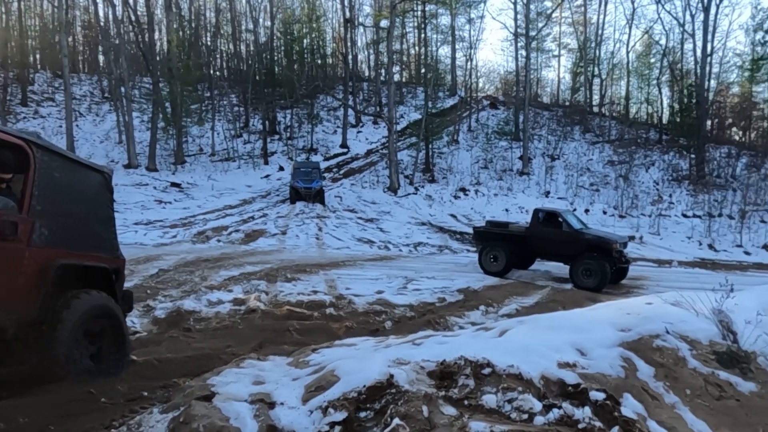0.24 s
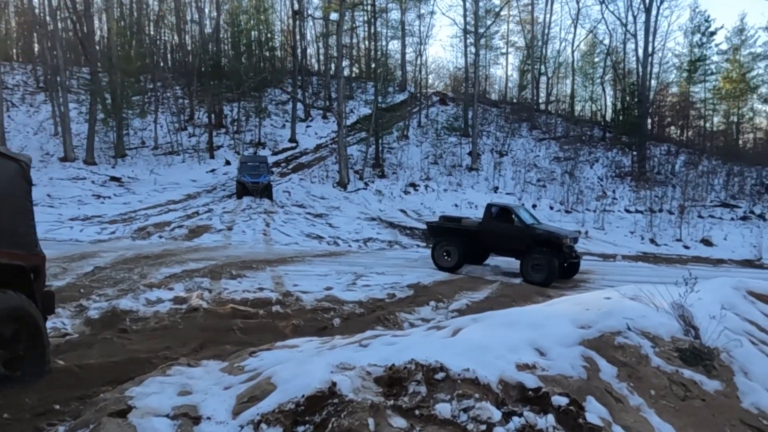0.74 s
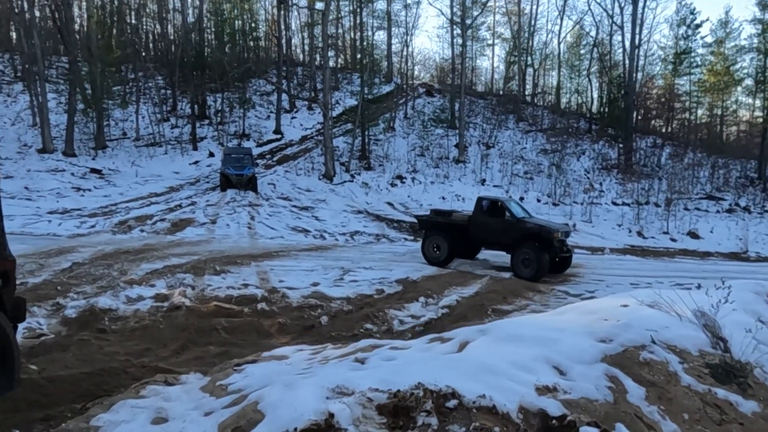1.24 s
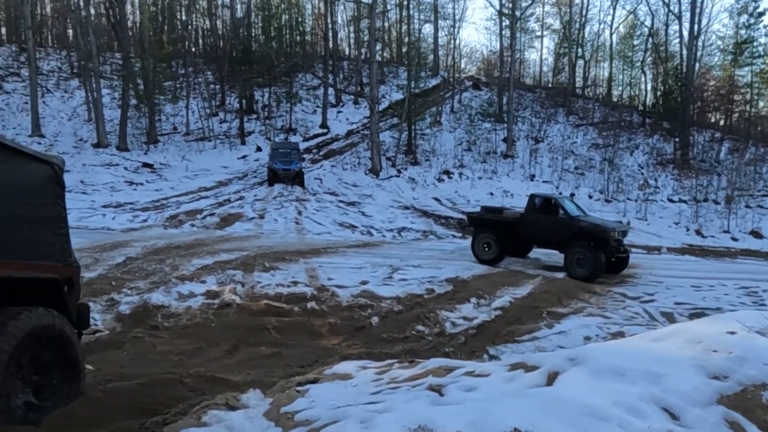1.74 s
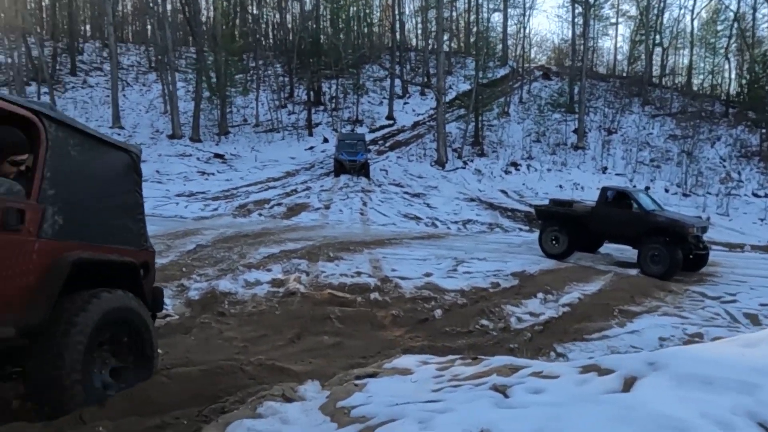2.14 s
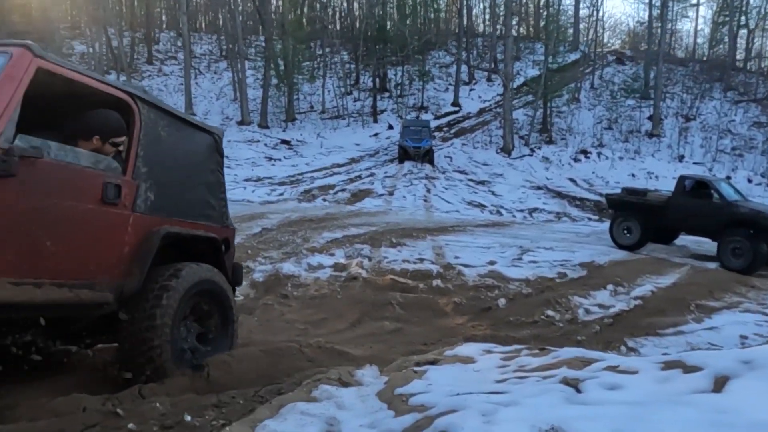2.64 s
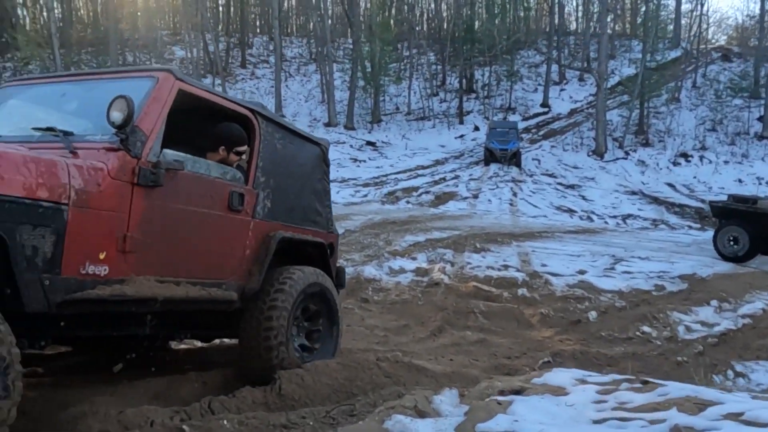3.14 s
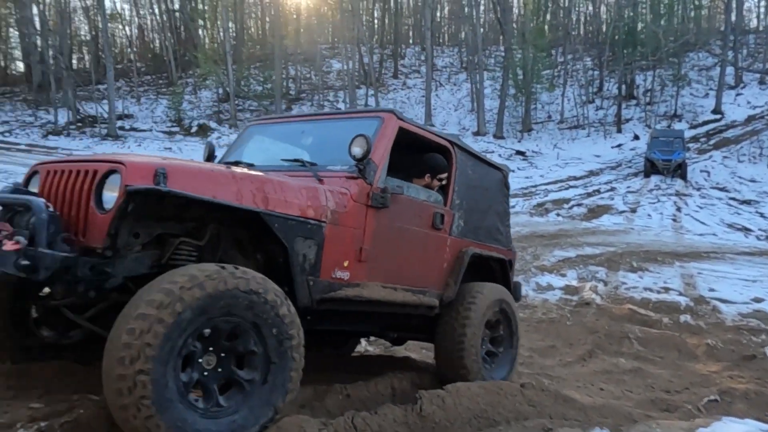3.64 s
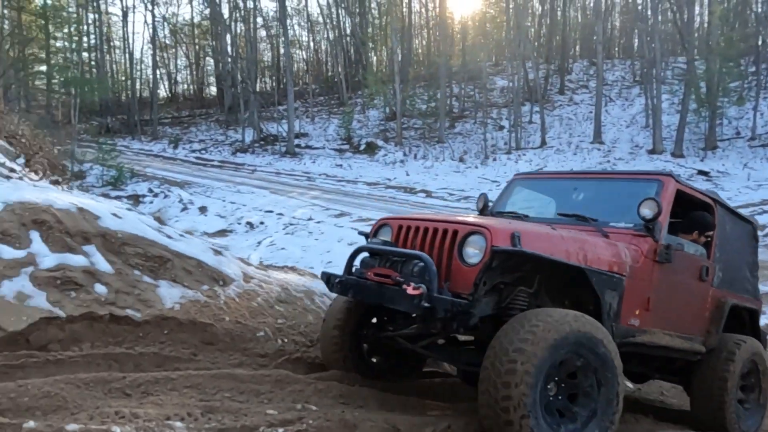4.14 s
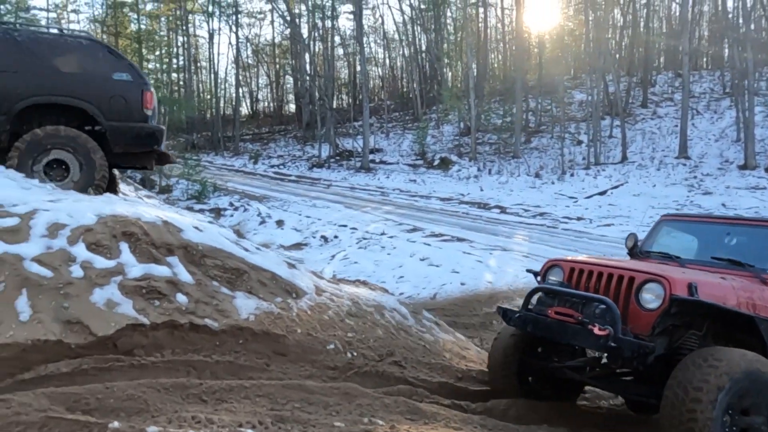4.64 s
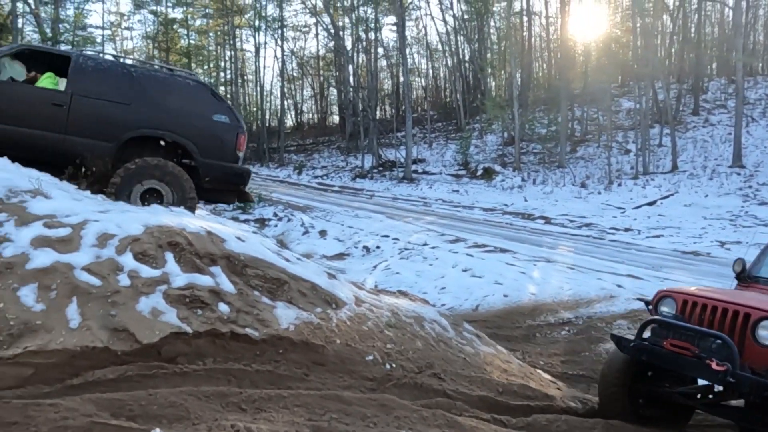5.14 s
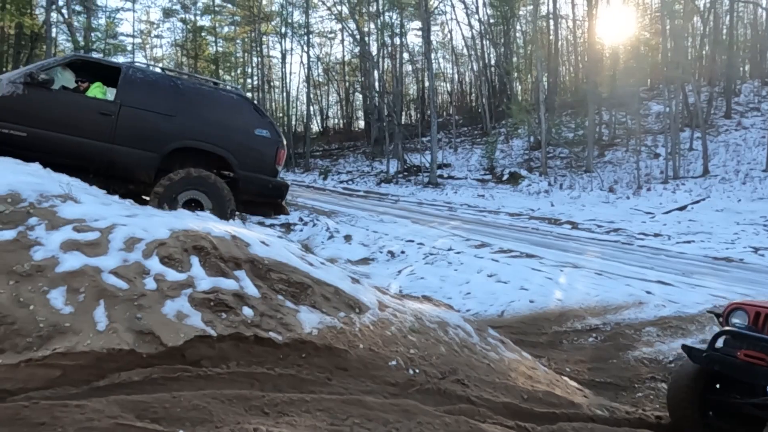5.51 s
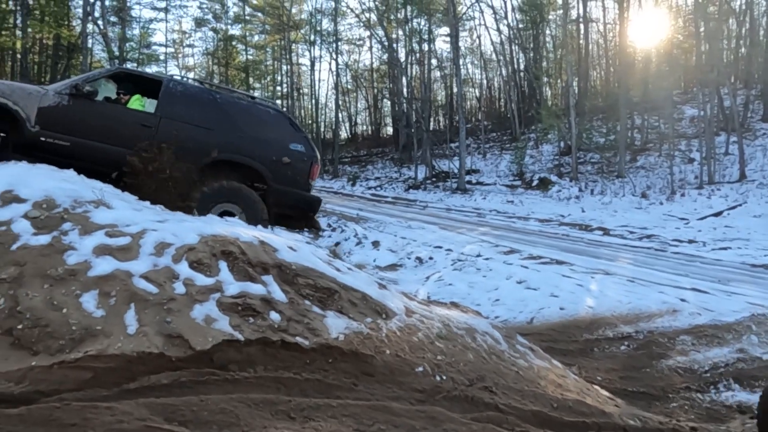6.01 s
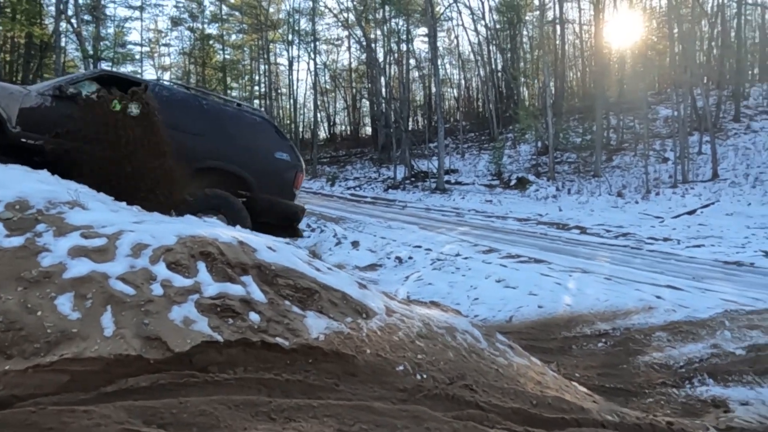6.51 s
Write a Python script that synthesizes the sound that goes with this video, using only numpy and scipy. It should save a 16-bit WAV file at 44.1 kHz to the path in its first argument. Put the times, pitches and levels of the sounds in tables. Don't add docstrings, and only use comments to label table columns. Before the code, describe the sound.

Steady V8 throb sinks to idle while another off-road engine blips far off, then roars repeatedly, crackles on overrun and climbs, flinging grit.

```python
import sys
import numpy as np
from scipy import signal
from scipy.fft import rfft, irfft, next_fast_len
from scipy.io import wavfile
from scipy.ndimage import uniform_filter1d

SR = 44100
rng = np.random.default_rng(int(sys.argv[2]) if len(sys.argv) > 2 else 0)


def log_audio(samples):
    frames = np.atleast_2d(samples).T
    limited = np.clip(frames, -1, 1)
    pcm = np.round(limited * 32767).astype(np.int16)
    wavfile.write(sys.argv[1], SR, pcm)


def volts_from_db(level):
    exponent = np.asarray(level, float) / 20
    return 10 ** exponent


N = 298557


def rms_one(x):
    return x / np.sqrt(np.mean(x ** 2) + 1e-20)


def in_time(rows):
    s, *columns = np.transpose(rows)
    return [np.interp(np.arange(N) / SR, s, c) for c in columns]


def on_log_axis(points, x):
    points = np.array(points)
    return np.interp(np.log(x), np.log(points[:, 0]), points[:, 1])


def drift(rate_hz):
    r = np.exp(-80 * np.pi * rate_hz / SR)
    white = rng.standard_normal(N // 40 + 2002)
    slow = signal.lfilter([1], [1, -2 * r, r * r], white)[2000:]
    return np.interp(np.arange(N) / 40, np.arange(len(slow)), rms_one(slow))


def cut(x, hz, kind, order=2):
    return signal.sosfilt(signal.butter(order, hz, kind, fs=SR, output="sos"), x)


def resonate(x, modes):
    out = 0
    for k, (hz, width_hz, db) in enumerate(modes):
        r = np.exp(-np.pi * width_hz / SR)
        b = (1 - r * r) / 2 * np.array([1, 0, -1])
        a = [1, -2 * r * np.cos(2 * np.pi * hz / SR), r * r]
        out = out + (-1) ** k * volts_from_db(db) * signal.lfilter(b, a, x)
    return out


def evened(x):
    power = uniform_filter1d(uniform_filter1d(x ** 2, size=6000), size=6000)
    return x / np.sqrt(power + 1e-12)


def gates(rows, open_db_per_s, shut_db_per_s):
    t = np.arange(0, N + 50, 50) / SR
    power = 0
    for s, end, db, end_db, *_ in rows:
        corners_s = [s - 60 / open_db_per_s, s, end, end + 60 / shut_db_per_s]
        power = power + volts_from_db(2 * np.interp(t, corners_s, [db - 60, db, end_db, end_db - 60]))
    return np.interp(np.arange(N) / SR, t, power)


def bursts(rows, decay_s, gain_db=0):
    s, db = np.transpose(rows)
    hits = np.zeros(N) + 1e-9
    hits[(s * SR).astype(int)] = volts_from_db(db + gain_db)
    return signal.lfilter([1], [1, -np.exp(-1 / (decay_s * SR))], hits) * rng.standard_normal(N)


# pitch_hz, share of the left-right dB
LEAN = [(60, .02), (250, 0.028), (500, 0.55), (1200, 1.54), (5000, 0.63), (12000, 2.3)]


def placed(x, hz, pan_db):
    left = np.exp(np.log(10) / 40 * on_log_axis(LEAN, hz) * pan_db)
    return x * np.reshape([left, 1 / left], (2, -1))


# firing_spread_db, out_of_step_turns, lag_per_order_turns
ROUGHNESS = dict(steady=(.6, 1, 0), blips=(1.2, .6, 0), revs=(.7, .14, 0), rasp=(.8, .35, 0),
             overrun=(1.4, 1, 0))
AGAINST = (4, 12, 13)


def firings(cycles, orders_db, voice, against):
    spread_db, out_of_step, lag = ROUGHNESS[voice]
    turns = np.cumsum(cycles / SR)
    phase_turns = out_of_step * rng.random(64) - lag / 2 * np.arange(1, 65) ** 2
    orders = np.zeros(1025, complex)
    orders[1:65] = np.resize(volts_from_db(np.array(orders_db)), 64) * np.exp(2j * np.pi * phase_turns)
    orders[list(against)] *= -1
    cycle = rms_one(irfft(orders))
    slowing = -uniform_filter1d(np.gradient(cycles) * SR, size=4000)
    overrun = 1 + np.clip(slowing / 30, 0, 1.2)
    chance = np.interp(8 * turns, np.arange(3000), rng.standard_normal(3000))
    pulses = np.interp(turns % 1, np.arange(2048) / 2048, cycle, period=1)
    return pulses * volts_from_db(spread_db * overrun * chance)


def engine(cycles, levels_db, orders_db, pipes, voice, in_step=False):
    size = next_fast_len(N + SR)
    pulses = rfft(firings(cycles, orders_db, voice, AGAINST if in_step else ()), size)
    click = signal.unit_impulse(SR // 2)
    out = []
    for db, (modes, band_hz) in zip(levels_db, pipes):
        colour = rfft(cut(resonate(click, modes), band_hz, "band"), size)
        if in_step:
            colour = np.abs(colour)
        out.append(-volts_from_db(db) * evened(irfft(pulses * colour, size)[:N]))
    return out


# start_s, cycles_per_s
STEADY_SPEED = [(0.0, 13.18), (0.5, 13.23), (1.0, 13.21), (1.5, 13.3), (2.0, 13.25), (2.3, 13.15),
                (2.5, 12.84), (2.7, 12.06), (3.0, 10.7), (3.4, 8.77), (3.7, 7.9)]
# start_s, cycles_per_s
IDLE_SPEED = [(4.2, 7.2), (4.6, 6.9), (6.8, 6.9)]


def near_speed():
    return in_time(list(STEADY_SPEED) + list(IDLE_SPEED))[0]


# start_s, boom_db
STEADY = [(0, -12), (2.3, -13), (2.7, -13), (3.2, -16), (3.36, -6), (3.45, -21), (3.56, -14), (3.7, -11),
          (4.1, -13.5), (4.3, -18), (4.5, -16), (4.75, -18.5), (4.9, -23.5), (5.3, -24), (5.6, -23),
          (6.8, -20)]
# cycles_per_s, db_re_boom
STEADY_BARK_SHARE = [(7, -13), (9, -32), (13, -29)]
# level_db; uneven banks feed 3, 5, 11, 13 beside firing order 8
STEADY_ORDERS = [-1.5, -31.5, -9, -13.5, -3, -54.5, -19.5, -4.5, -18, -16.5, -7, -18, -8.5, -24.5, -5, -5]
# pitch_hz, width_hz, level_db
STEADY_BOOM = [(74.9, 30.7, 4), (111.2, 35, 5.5), (176, 77, -6.5)]
# pitch_hz, width_hz, level_db
STEADY_BARK = [(253, 40, -10), (361, 40, -12.5), (562, 36, -5.5), (1240, 76, -17)]


def near_engine():
    cycles = near_speed()
    boom_db = in_time(STEADY)[0]
    bark_db = boom_db + on_log_axis(STEADY_BARK_SHARE, cycles)
    pipes = [(STEADY_BOOM, [40, 240]), (STEADY_BARK, [230, 1500])]
    return engine(cycles, (boom_db, bark_db), STEADY_ORDERS, pipes, "steady")


# start_s, cycles_per_s
REVS_SPEED = [(2.55, 22.27), (2.75, 31.7), (2.88, 35.87), (3.05, 33.53), (3.4, 38.9), (3.58, 35.31),
              (3.91, 43.4), (4.05, 39.57), (4.2, 34.12), (4.7, 14.04), (4.82, 12.34), (5.0, 18.22),
              (5.15, 21.27), (5.43, 13.16), (6.2, 33.0), (6.35, 36.0), (6.55, 38.67), (6.77, 40.49)]
# open_s, shut_s, open_roar_db, shut_roar_db, drone_db_re_boom
STABS = [
    (2.567, 2.802, -38, -34.5, -1.5),
    (3.086, 3.336, -35, -32, -3),
    (3.614, 3.854, -31, -30, -4.5),
    (4.025, 4.161, -30.5, -33, -34),
    (4.88, 5.044, -31.5, -34, -19.5),
    (5.509, 5.562, -32, -32, -23),
    (5.698, 6.108, -29, -32, -6),
    (6.163, 6.765, -30.5, -30.5, -6),
]
# start_s, shut_rush_db, left_right_db, distance_dulling_db
PASSAGE = [(0, -37, 2.5, -3.5), (.5, -40, 3.5, -2), (1.0, -41, 6, -0.5), (1.43, -41.5, 9, 1),
           (2.2, -39, 6, 3.5), (3.0, -40, 4, -3), (3.5, -40.5, 4.5, -3.5), (3.94, -39, 1.5, -6),
           (4.28, -38.5, -0.5, -1.5), (4.42, -39, 2, 5.5), (4.75, -46, 0, 5.5), (4.9, -42, 3, 12.5),
           (5.2, -43, 0, 10.5), (5.41, -50, -2, 5.5), (5.62, -41.5, 3.5, 14), (5.8, -34.5, -2.5, 8.5),
           (6.2, -46.5, 0, 4.5), (6.77, -34, -1.5, -1)]


def controls():
    shut_db, pan_db, dull_db = in_time(PASSAGE)
    stabs = gates(STABS, open_db_per_s=174, shut_db_per_s=120.5)
    power = stabs + volts_from_db(2 * shut_db)
    opened = stabs / power
    return in_time(REVS_SPEED)[0], 10 * np.log10(power), opened, pan_db * (1 + opened), dull_db


TURN_AWAY_S = 3.97
LOW_OPEN_DB = -14
# cycles_per_s, level_db
DRONE_SHARE = [(14, -9.5), (24, -10), (32, 4.5), (36, -2), (41, -14)]
# cycles_per_s, db_re_roar
BARK_SHARE = [(14, 5.5), (28, 12.5), (35, 15), (42, 16.5)]
# cycles_per_s, level_db
BOOM_SHARE = [(13, -7.5), (19, 1.5), (24, 2.1)]


def rev_levels(cycles, roar_db, opened):
    shut_db, lag_s, arrive_s = -19.5, 0.11, 2.5
    near_db = in_time([(arrive_s - .15, -45), (arrive_s, 0)])[0]
    low_db = shut_db + (LOW_OPEN_DB - shut_db) * uniform_filter1d(opened, int(lag_s * SR)) + near_db
    slowing = np.clip(-uniform_filter1d(np.gradient(cycles) * SR, size=4000) / 63, 0, 1)
    low_db = low_db + slowing * (1 - opened)
    lean_db = in_time([(s, row[4]) for row in STABS for s in row[:2]])[0]
    lean_db = lean_db + on_log_axis(DRONE_SHARE, cycles)
    boom_db = low_db - 10 * np.log10(1 + volts_from_db(2 * lean_db))
    away_db = in_time([(TURN_AWAY_S, 0), (TURN_AWAY_S + 0.012, -4.5)])[0]
    bark_db = roar_db + on_log_axis(BARK_SHARE, cycles) + near_db + away_db - 9 * (1 - opened)
    return boom_db + on_log_axis(BOOM_SHARE, cycles), boom_db + lean_db, bark_db


REVS_ORDERS = [-10, 5, 5, -3.5, 10, -30, -14, 2.5, 6, -5, 4, -5.5, 5.5, 6, -30, 8, 1, -10.5, 3, 6, -1, -10,
               1.5, 5.5]
# pitch_hz, width_hz, level_db
REVS_BOOM = [(66.7, 116, -8.5), (126.4, 21.7, 2)]
# pitch_hz, width_hz, level_db
REVS_DRONE = [(178, 54, 0.1)]
# pitch_hz, width_hz, level_db
REVS_BARK = [(268.3, 26, 9.5), (389.8, 44, 8), (525, 69, -1), (643, 100, -3.5)]
# pitch_hz, width_hz, level_db
SHUT_PIPE = [(74, 30, -4)]
LOW_BAND_HZ, DRONE_BAND_HZ, MIDDLE_BAND_HZ = [40, 144], [145, 192.7], [230, 615]


def revving_engine(cycles, roar_db, opened):
    levels_db = rev_levels(cycles, roar_db, opened)
    pipes = [(REVS_BOOM, LOW_BAND_HZ), (REVS_DRONE, DRONE_BAND_HZ), (REVS_BARK, MIDDLE_BAND_HZ)]
    boom, drone, bark = engine(cycles, levels_db, REVS_ORDERS, pipes, "revs", in_step=True)
    boom = boom - (1 - opened) * resonate(boom, SHUT_PIPE)
    return boom + drone, growled(bark, levels_db[2], cycles, opened)


# cycles_per_s, power_0_1
CLEAN_SHARE = [(16, .4), (24, .85), (31, .97), (38, .99)]
# cycles_per_s, share
LOW_PIPE_LOSS = [(30, .05), (36, 0.045), (39, 0.78), (42, 0.37)]
# pitch_hz, width_hz, level_db
LOW_PIPE = [(280, 87, 0)]
# pitch_hz, width_hz, level_db
SIDE_PIPE = [(625, 90, 2.5), (505, 90, -4), (330, 60, -3)]
# pitch_hz, width_hz, level_db
AWAY_PIPE = [(508, 99, 1.5), (419, 80, -9.5)]


def growled(bark, bark_db, cycles, opened):
    behind_s = 5.2
    clean = on_log_axis(CLEAN_SHARE, cycles) * (.55 + .45 * opened)
    gas = rms_one(cut(resonate(rng.standard_normal(N), REVS_BARK), [230, 726], "band"))
    bark = np.sqrt(clean) * bark + np.sqrt(1 - clean) * volts_from_db(bark_db) * gas
    bark = bark - np.clip(on_log_axis(LOW_PIPE_LOSS, cycles), 0, 1) * resonate(bark, LOW_PIPE)
    side, behind = in_time([(TURN_AWAY_S, 0, 0), (TURN_AWAY_S + 0.03, 1, 0),
                            (behind_s, 1, 0), (behind_s + .1, 0, 1)])
    return bark + side * resonate(bark, SIDE_PIPE) + behind * resonate(bark, AWAY_PIPE)


# cycles_per_s, db_re_low_power
LUG_SHARE = [(12, -0.5), (17, -7.5), (20, -29.5), (24, -55)]


def lug(cycles, opened):
    pull = uniform_filter1d(opened * (np.gradient(cycles) > 0), size=1000, origin=-400)
    level = volts_from_db(LOW_OPEN_DB + 8.5 + on_log_axis(LUG_SHARE, cycles))
    return pull * level * np.sin(16 * np.pi * np.cumsum(cycles) / SR)


# pitch_hz, width_hz, level_db
REVS_RASP = [(800, 160, -3), (960, 120, 0), (1200, 200, -7), (1680, 260, -7), (2000, 500, -13)]
# cycles_per_s, db_re_roar
RASP_SHARE = [(15, -14), (32, -9), (37, -2.5), (41, 0)]


def rasp(cycles, roar_db):
    level_db = in_time([(2.4, -60), (2.55, 0)])
    orders = engine(cycles, level_db, REVS_ORDERS, [(REVS_RASP, [700, 2200])], "rasp", in_step=True)[0]
    return volts_from_db(roar_db + on_log_axis(RASP_SHARE, cycles)) * orders + honk(orders)


# start_s, length_s, pitch_hz, level_db, width_re_pitch
HONK = [(0.0, 1.3, 1110, -50, .14), (.9, 1.6, 1240, -53, .16), (2.555, .31, 1900, -41, .26),
        (2.57, .29, 1050, -43, .35), (3.06, .34, 1960, -36, .22), (3.08, .3, 1600, -41, .12),
        (3.6, .25, 1660, -36, .08), (3.7, .1, 2420, -42, .07), (3.995, .11, 965, -31, .06),
        (3.995, .08, 1075, -33, .06), (4.815, .17, 1300, -39, .3), (4.96, .13, 1850, -41, .2),
        (6.04, .5, 1760, -43, .16), (6.5, .4, 1170, -36, .08), (5.8, 2.1, 2600, -39.5, .6)]


def honk(orders):
    out = np.zeros(N)
    drive = cut(orders, 1400, "low", order=4) + .6 * rng.standard_normal(N)
    for s, length_s, hz, db, width in HONK:
        span = slice(int(s * SR), int((s + length_s) * SR))
        ring = [(hz, width * hz, 0)]
        tone = rms_one(resonate(resonate(drive[span], ring), ring))
        fade = np.hanning(int(length_s * SR) + 1)[:len(tone)] ** .16
        out[span] += volts_from_db(db + 6) * fade * tone
    return out


# start_s, level_db
BURBLE = [(3.9, -70), (4.15, -25), (4.35, -21.5), (4.6, -33), (4.9, -29.5), (5.2, -31), (5.4, -33.5),
          (5.6, -31.5), (5.9, -66)]
# pitch_hz, width_hz, level_db
BURBLE_PIPE = [(315.6, 24.6, 0.1)]


def burble(cycles):
    level_db = in_time([(0, -103.0)] + list(BURBLE))
    return engine(cycles, level_db, REVS_ORDERS, [(BURBLE_PIPE, MIDDLE_BAND_HZ)], "overrun")[0]


# start_s, peak_db
POPS = [
    (4.25, -29),
    (4.32, -29),
    (4.474, -23),
    (4.58, -31),
    (4.608, -25),
    (4.749, -20),
    (5.496, -19.5),
]


def pops():
    bangs = cut(bursts(POPS, decay_s=.016), 3000, "low")
    return volts_from_db(14.5) * resonate(bangs, REVS_BARK) + volts_from_db(6) * resonate(bangs, REVS_RASP[:2])


# start_s, cycles_per_s
BLIPS_SPEED = [(0.0, 21.5), (0.25, 21.4), (0.5, 16.41), (0.8, 13.09), (1.0, 12.87), (1.5, 26.0),
               (2.0, 34.39), (2.27, 42.43), (2.4, 40.35)]
# open_s, shut_s, open_db, shut_db
BLIPS = [
    (.25, .35, -22, -19),
    (.75, .85, -22, -30),
    (1.15, 1.18, -16.5, -18.5),
    (1.38, 1.88, -15, -23),
    (2.15, 2.3, -24, -23),
]
# cycles_per_s, db_re_boom
BLIP_BARK_SHARE = [(13, -18), (17, -19.5), (22, -20), (30, -15.5), (42, -10)]
BLIPS_ORDERS = [-15, 0.5, 5, -19, 8, -38.5, -13.5, 4, 5.5, -5, 4.5, -22, 6, 6, -45, 7.5]
# pitch_hz, width_hz, level_db
BLIPS_BOOM = [(69.5, 67, -12), (126, 17, 1), (152, 26, -3.5)]
# cycles_per_s, power_0_1
FAR_CLEAN_SHARE = [(30, .05), (37, .2), (41, .9)]


def far_engine():
    end_s, idle_db = 2.42, -23
    cycles = in_time(BLIPS_SPEED)[0]
    away_db = in_time([(end_s, 0), (end_s + 0.23, -35)])[0]
    power = gates(BLIPS, open_db_per_s=77, shut_db_per_s=82) + volts_from_db(2 * idle_db)
    boom_db = 10 * np.log10(power) + away_db
    bark_db = boom_db + on_log_axis(BLIP_BARK_SHARE, cycles)
    pipes = [(BLIPS_BOOM, LOW_BAND_HZ), (REVS_BARK, MIDDLE_BAND_HZ)]
    boom, bark = engine(cycles, (boom_db, bark_db), BLIPS_ORDERS, pipes, "blips")
    clean = on_log_axis(FAR_CLEAN_SHARE, cycles)
    return boom, bark * (np.sqrt(clean) + np.sqrt(1 - clean) * drift(40))


# pitch_hz, left_right_likeness_0_1
LIKENESS = [(25, .95), (100, .95), (500, .96), (1500, .92), (4500, .85), (9000, .65), (13000, .2)]


def banded_noise(spectrum, low_hz, high_hz, patchy_db, pan_db, count=2):
    out, together, white = 0, drift(12.7), rng.standard_normal((2, 2, N))
    edges_hz = np.geomspace(low_hz, high_hz, round(count * np.log2(high_hz / low_hz)) + 1)
    for k, (low, high) in enumerate(zip(edges_hz, edges_hz[1:])):
        mid, side = cut(white[k % 2], [low, high], "band")
        hz = np.sqrt(low * high)
        alike = np.clip(on_log_axis(LIKENESS, hz), 0, 1)
        gain = volts_from_db(on_log_axis(spectrum, hz) + patchy_db * (0.82 * together + drift(16.6)))
        band = np.sqrt(1 + alike) * mid + np.sqrt(1 - alike) * side * [[1], [-1]]
        out = out + placed(gain * band, hz, pan_db)
    return out / np.sqrt(np.mean(out.mean(axis=0) ** 2))


# pitch_hz, db_per_hz
ROAR = [(350, -29), (600, -1), (768, -2), (950, -3), (1270, -3), (1690, -7.5), (2610, -12), (5170, -18)]
# pitch_hz, db_per_hz
HISS = [(2610, -14), (5170, -16), (6470, -21), (7300, -24), (8280, -31.5), (9500, -34.5), (11000, -43.5)]
# pitch_hz, db_per_hz
TOP = [(9500, -14), (10300, -15), (11200, -10), (12200, 0), (13200, -4), (13800, -9), (14300, -20),
       (15600, -27)]
# cycles_per_s, level_db
NOISE_SHARE = [(30, 0.7), (37, 4), (41, 4.5)]
CLATTER = [(2, 0.082), (3, 0.11), (5, 0.09)]


def rush(cycles, roar_db, opened, pan_db, dull_db):
    hiss_db = -7.5 - 2 * opened - 0.57 * dull_db
    away_db = in_time([(TURN_AWAY_S, 0), (TURN_AWAY_S + .1, -2)])[0]
    top_db = -21.5 - 6 * opened - dull_db + away_db
    turns = np.cumsum(cycles / SR)
    throb = 0.059 * np.cos(2 * np.pi * turns) + 0.12 * np.cos(6 * np.pi * turns)
    load = np.clip((roar_db + 42.5) / 14, .2, 1)
    roar = banded_noise(ROAR, 650, 3300, 1.2, pan_db, count=3)
    roar = volts_from_db(roar_db - 1.5 + on_log_axis(NOISE_SHARE, cycles)) * roar
    hiss = volts_from_db(roar_db + hiss_db - 1.5) * banded_noise(HISS, 3260, 11230, 0.89, pan_db, count=4)
    top = volts_from_db(roar_db + top_db - 3.0) * banded_noise(TOP, 6900, 16000, 1.5, pan_db, count=9)
    near = np.cumsum(near_speed() / SR)
    clatter = (1 - opened) * sum(depth * np.cos(2 * np.pi * order * near) for order, depth in CLATTER)
    return (1 + load * throb) * roar + (1 + 2.0 * opened * throb + clatter) * (hiss + top)


FAN_BLADES = 24
# pitch_hz, width_hz, level_db
FAN_SHROUD = [(4850, 800, 0), (6050, 1050, 0)]
# start_s, lower_db, upper_db
FAN = [(3.7, -70, -70), (3.92, -50, -60), (3.97, -40, -44), (4.05, -45, -45), (4.12, -50, -56),
       (4.2, -46, -58), (4.3, -56, -62), (4.53, -56, -68), (4.6, -72, -75), (5.8, -75, -66),
       (6.05, -62, -54), (6.15, -64, -55), (6.25, -62, -48), (6.52, -60, -47), (6.77, -56, -53)]


def fan():
    turns = FAN_BLADES * np.cumsum(in_time(REVS_SPEED)[0] / SR)
    partials = sum(np.sin(2 * np.pi * k * turns) for k in range(5, 11))
    out = 0
    for db, shroud in zip(in_time(FAN), FAN_SHROUD):
        out = out + volts_from_db(db + 3 * drift(40)) * resonate(resonate(partials, [shroud]), [shroud])
    return out


def whistle(rows, waver, flutter_db, times=1):
    grip_s, slip_share, edge_db, fade_s = 0.015, 0.67, -6, .015
    catch_rise, catch_s, sag_per_s = 0.026, 0.023, 0.019
    out = np.zeros(N)
    wobble, flutter = 1 + waver * drift(60), volts_from_db(flutter_db * drift(49))
    for s, length_s, hz, db, *end_hz in rows:
        first, last = int((s - fade_s) * SR), int((s + length_s + fade_s) * SR)
        span = np.arange(max(first, 0), min(last, N))
        t = span / SR - s
        corners_s = [0, min(grip_s, length_s / 2), length_s * (1 - slip_share / 2), length_s]
        level_db = db + np.interp(t, corners_s, [edge_db, 0, 0, edge_db])
        fade = np.clip(np.minimum(t, length_s - t) / fade_s + 1, 0, 1)
        if end_hz:
            glide_hz = np.interp(t, [0, length_s], [hz, end_hz[0]])
        else:
            catch = catch_rise * np.exp(-np.maximum(t, 0) / catch_s)
            glide_hz = hz * (1 - sag_per_s * (t - length_s / 2) + catch)
        phase = 2 * np.pi * np.cumsum(times * glide_hz * wobble[span]) / SR
        out[span] += fade * volts_from_db(level_db + 10) * np.sin(phase)
    return out * flutter


# start_s, length_s, pitch_hz, level_db, end_hz
SQUEAL_1 = [(.298, .035, 3460, -47.5, 3330), (.33, .045, 3320, -54, 3270), (.38, 0.06, 3330, -51.5, 3260),
            (.485, 0.097, 3340, -50, 3290), (.62, 0.036, 3310, -59, 3320), (.76, .06, 3430, -45.5, 3350),
            (.815, .09, 3330, -51, 3240), (.91, 0.083, 3330, -49, 3270), (1.11, 0.16, 3330, -53.5, 3220),
            (1.275, 0.063, 3280, -53.5, 3250), (1.612, 0.058, 3385, -44, 3395),
            (1.655, .11, 3400, -45.5, 3425), (1.745, 0.097, 3430, -52, 3280),
            (1.86, 0.065, 3350, -57, 3250), (2.13, 0.09, 3440, -56.5, 3450), (2.72, 0.14, 3390, -58, 3360),
            (3.455, 0.048, 3390, -46, 3360), (3.515, 0.054, 3390, -46, 3310)]
# start_s, length_s, pitch_hz, level_db
SQUEAL_2 = [(1.4, 0.3, 7040, -71), (1.8, 0.46, 6970, -72), (2.2, 0.17, 6970, -68), (2.56, 0.39, 6920, -64),
            (3.38, 0.46, 7120, -65), (4.455, .025, 6900, -65), (4.57, 0.017, 6900, -65),
            (5.62, .45, 6800, -68)]
# start_s, length_s, pitch_hz, level_db, end_hz (some)
SQUEAL_3 = [(1.43, .06, 10300, -76), (1.64, .08, 10300, -73), (1.855, .115, 10300, -67),
            (2.005, .05, 10380, -67), (2.115, .025, 10100, -74), (2.175, .075, 10200, -71),
            (2.27, .045, 10350, -70), (2.365, .04, 10250, -69), (2.42, .12, 10300, -67),
            (2.6, .4, 10450, -76), (3.9, .35, 10400, -62, 10700), (4.22, .26, 10650, -61, 10150),
            (4.46, .25, 10200, -69, 10500), (4.72, .68, 10600, -79, 10250)]
# start_s, length_s, pitch_hz, level_db, end_hz
RATTLE = [(0.0, 0.078, 5760, -58, 5860), (.075, .05, 6020, -48.5, 5900), (.345, .03, 5950, -61, 6080),
          (.445, 0.034, 5850, -56, 5950), (.475, 0.075, 6020, -49, 5800), (.555, .022, 5930, -48, 5940),
          (.9, 0.039, 5920, -52.5, 6060), (5.05, .14, 6050, -69.5, 5800)]


def squeals(pan_db):
    low = whistle(SQUEAL_1, 0.0024, 1) + whistle(SQUEAL_2, 0.0051, 5.7) + whistle(RATTLE, 0.0073, 5.3)
    third = whistle(SQUEAL_3, 0.013, 4.1)
    fourth = volts_from_db(-14) * whistle(SQUEAL_3, .008, 4.0, times=1.31)
    return placed(low, 4000, pan_db) + placed(third + fourth, 7000, pan_db)


# start_s, peak_db
CRACKS = [(4.024, -19), (4.047, -17), (4.079, -23), (4.134, -26), (5.763, -29), (5.9194, -32), (6.095, -34),
          (6.2894, -22), (6.488, -21), (6.5995, -16), (6.6846, -24.5), (6.749, -14.5)]


def cracks():
    return cut(bursts(CRACKS, decay_s=0.0041, gain_db=1.7), [1500, 4870], "band", order=3)


# start_s, level_db
GRIT = [(5.41, -100), (5.44, -69), (5.6, -67), (5.68, -60), (5.8, -68), (6.2, -61.5), (6.77, -64.5)]
# low_hz, high_hz
GRIT_HZ = [9000, 13000]


def grit():
    grains_per_s = 2500
    sizes = volts_from_db(3 * np.minimum(rng.exponential(size=N), 4))
    grains = (rng.random(N) < grains_per_s / SR) * sizes * rng.choice([-1, 1], size=N)
    return volts_from_db(in_time(GRIT)[0] + 1.5 * drift(40)) * rms_one(cut(grains, GRIT_HZ, "band", order=3))


def slope_echo(x):
    dull, out = cut(x, 1500, "low"), np.zeros((2, N))
    lags = (rng.uniform(0.024, 0.12, size=8) * SR).astype(int)
    for k, lag in enumerate(lags):
        out[k % 2, lag:] += dull[:-lag] * (-1) ** (k // 2)
    return out


# pitch_hz, db_per_hz
RUMBLE = [(20, -9), (32, -3), (45, -1), (60, -3), (120, -8), (250, -18), (600, -34)]


def rumble():
    return volts_from_db(-28) * banded_noise(RUMBLE, 26.0, 620, 3.2, 0, count=1.5)


def scene():
    cycles, roar_db, opened, pan_db, dull_db = controls()
    near_boom, near_bark = near_engine()
    far_boom, far_bark = far_engine()
    revs_boom, revs_bark = revving_engine(cycles, roar_db, opened)
    duck = volts_from_db(-11 * uniform_filter1d(opened, size=3000) * np.clip((cycles - 22) / 10, 0, 1))
    boom = duck * near_boom + far_boom + revs_boom + lug(cycles, opened)
    bark = near_bark + revs_bark + burble(cycles)
    upper = rasp(cycles, roar_db)
    mix = placed(boom, 100, pan_db) + placed(bark, 500, pan_db) + placed(upper, 890, pan_db)
    mix = mix + placed(far_bark, 500, pan_db) + placed(pops(), 1200, -10.0)
    mix = mix + rush(cycles, roar_db, opened, pan_db, dull_db) + fan() + squeals(pan_db)
    mix = mix + cracks() + grit() + rumble()
    return mix + volts_from_db(-28.5) * slope_echo(bark + upper + 0.095 * boom)


def top_cut(x):
    return signal.sosfilt(signal.butter(12, 15720, fs=SR, output="sos"), x)


# start_s, side_db
WIDTH = [(0, 0), (4.85, 0), (5.1, -14), (5.5, -26), (6.3, -26), (6.45, -20), (6.65, -21), (6.77, -15)]


def record(dry):
    mid = dry.mean(axis=0)
    side = (dry[0] - dry[1]) / 2 * volts_from_db(in_time(WIDTH)[0])
    narrowed = np.array([mid + side, mid - side])
    return top_cut(1.138 * np.tanh(narrowed / 1.35))


dry = scene()
out = record(dry)
log_audio(out)
```